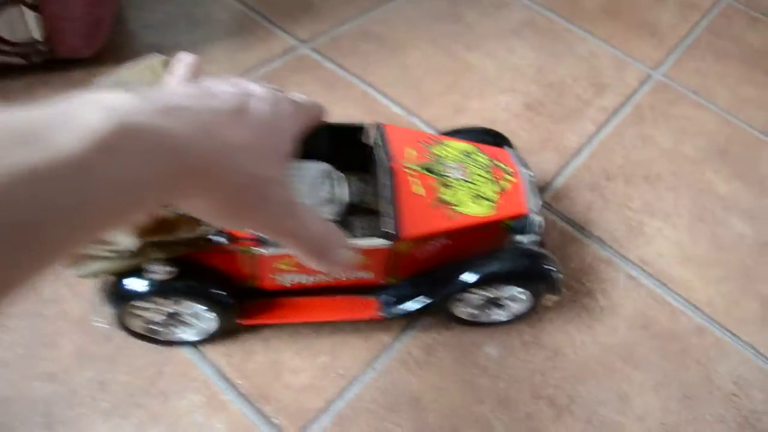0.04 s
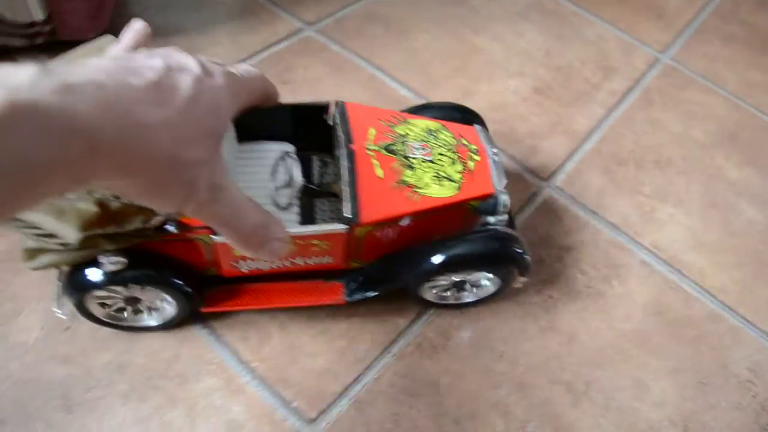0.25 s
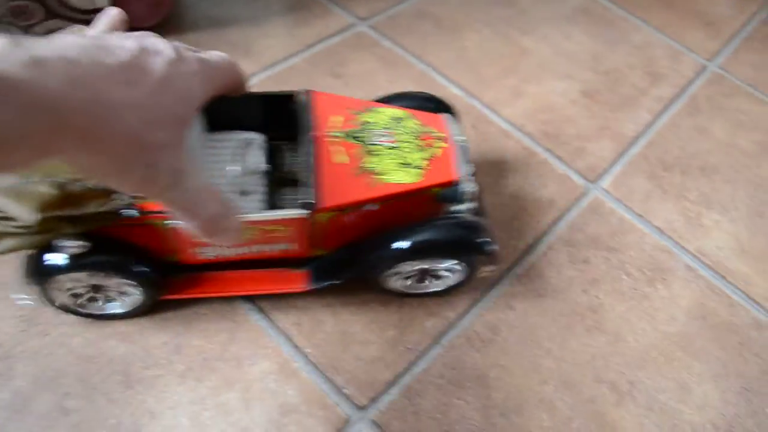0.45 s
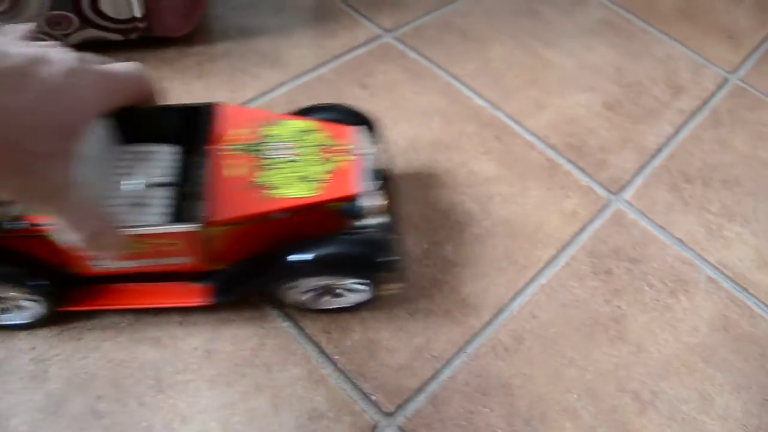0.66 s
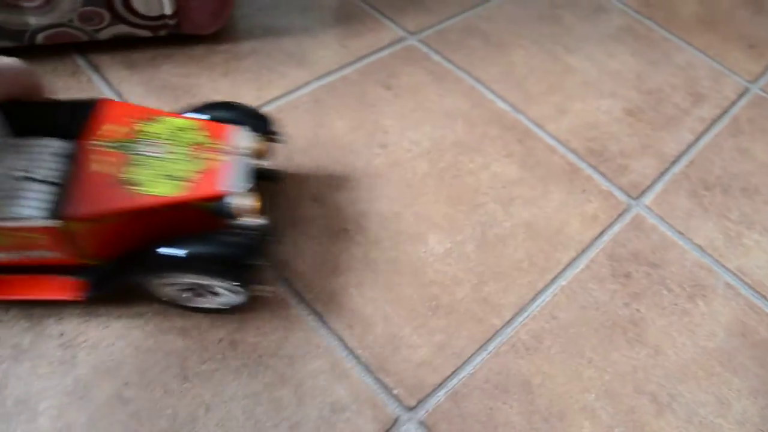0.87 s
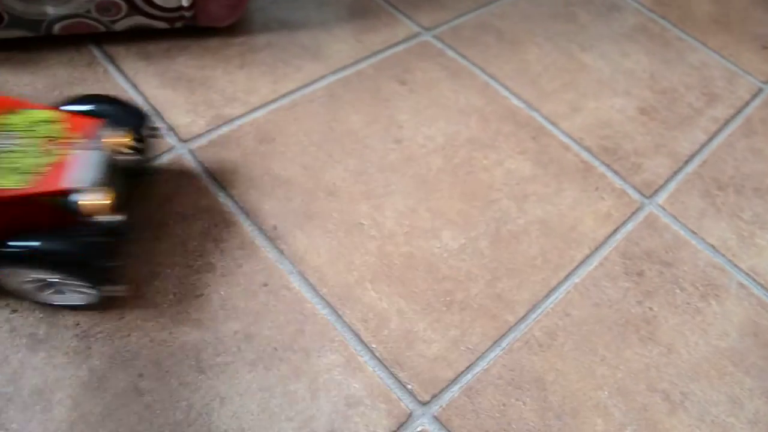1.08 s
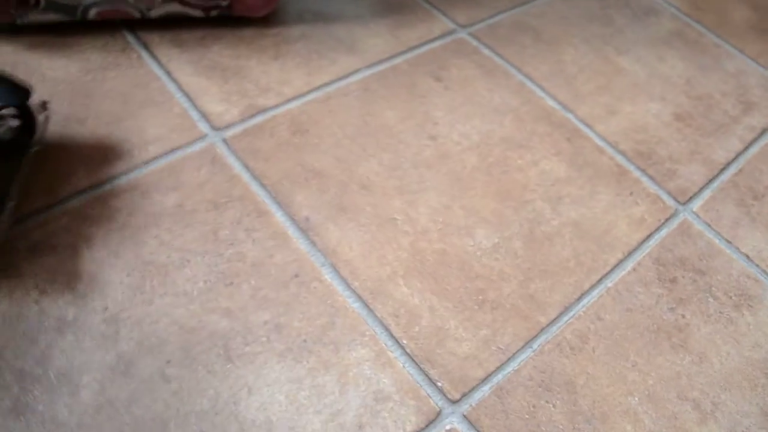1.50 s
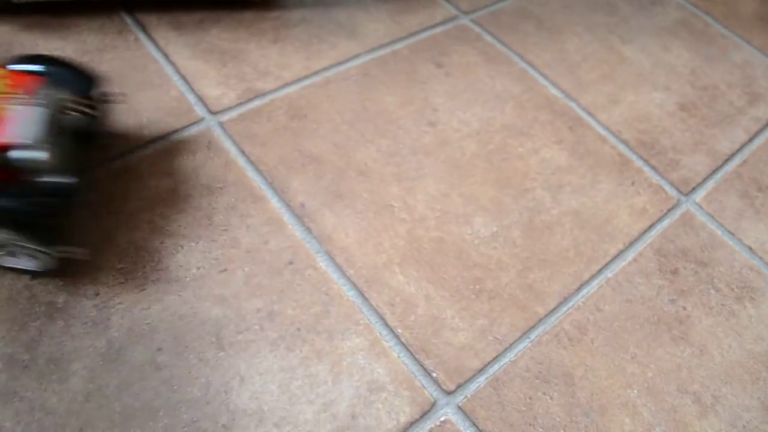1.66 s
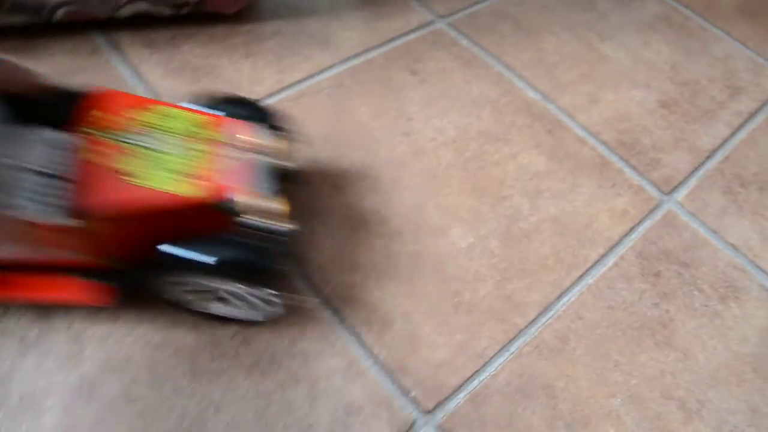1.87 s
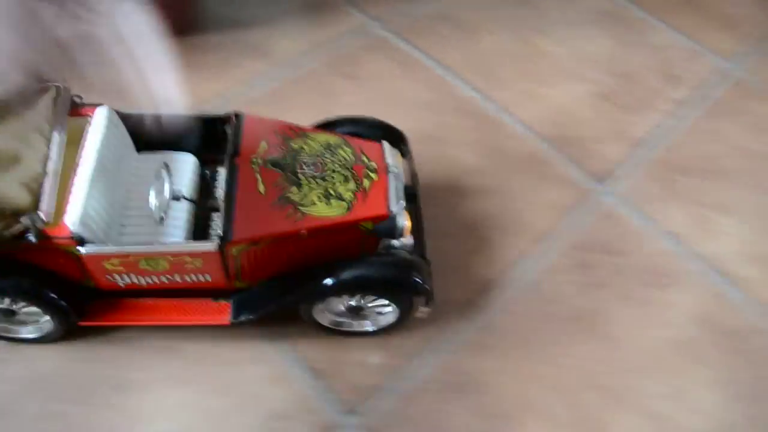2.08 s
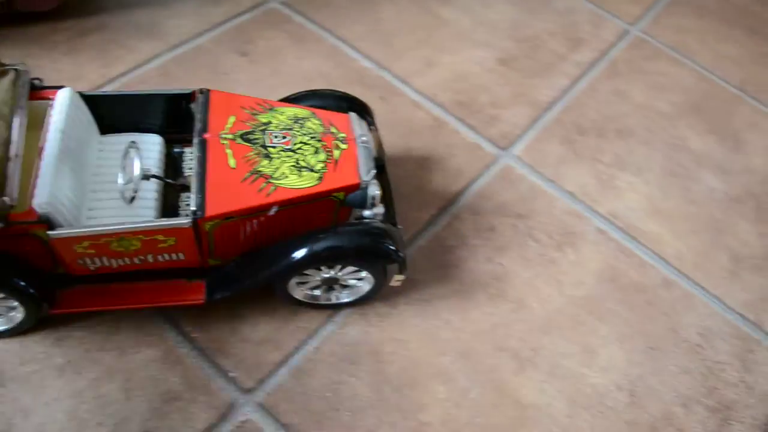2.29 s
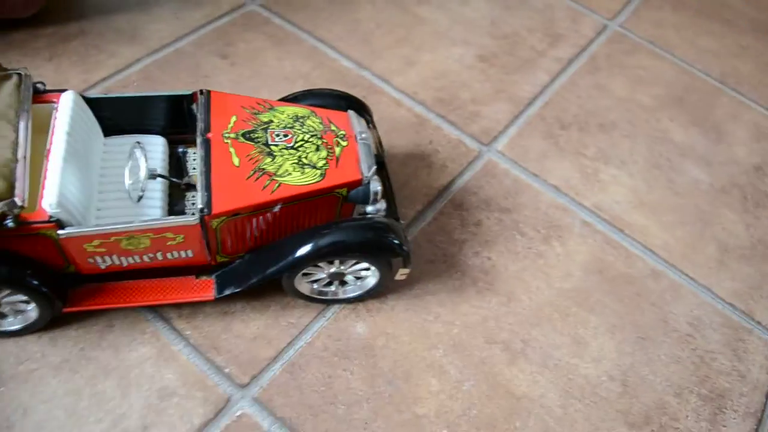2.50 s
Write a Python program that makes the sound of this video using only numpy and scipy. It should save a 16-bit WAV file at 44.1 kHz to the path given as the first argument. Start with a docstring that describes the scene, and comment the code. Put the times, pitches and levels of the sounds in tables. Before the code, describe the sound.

A tin toy car's gears grind and whine as it rolls back, then forward on tiles.

```python
"""The flywheel motor of a tin toy car, pushed back and then forward over a tiled floor indoors.
Loose gears chatter into the tin body; the pinion whines and the unbalanced flywheel hums as it
gains speed. Loose parts clack, narrow resonances swell and fade, and the wheels rumble on the
tiles. A small hard room answers the rattle, over a faint bed of air."""
import sys
import numpy as np
from scipy import signal
from scipy.fft import rfft, irfft, next_fast_len
from scipy.io import wavfile
from scipy.ndimage import uniform_filter1d, map_coordinates

SR = 44100
rng = np.random.default_rng(int(sys.argv[2]) if len(sys.argv) > 2 else 0)


def generate_wav(signal):
    """Clip the signal to [-1, 1] and save it as 16-bit WAV at the path in sys.argv[1]."""
    frames = np.transpose(np.atleast_2d(signal))
    scaled = np.clip(frames, -1, 1) * 32767
    pcm = np.round(scaled).astype(np.int16)
    wavfile.write(sys.argv[1], SR, pcm)


N = 116865


def amp(db):
    """Decibels to gain."""
    return 10 ** (np.asarray(db) / 20)


def unit(x):
    """Scale to rms 1."""
    return x / np.sqrt(np.mean(x ** 2) + 1e-20)


def curves(rows):
    """Automation lanes: one value per sample for each column after the time."""
    times, *columns = np.transpose(rows)
    return [np.interp(np.arange(N) / SR, times, column) for column in columns]


def wobble(rate):
    """A smooth random curve, rate knots a second."""
    return map_coordinates(rng.standard_normal(4096), [np.arange(N) * rate / SR], mode="wrap")


def equalise(x, points):
    """Minimum-phase EQ through (Hz, dB) points."""
    size = 2 * next_fast_len(N)
    hz, db = np.transpose(points)
    gain = amp(np.interp(np.log(np.fft.rfftfreq(size, 1 / SR) + 1), np.log(hz), db))
    cepstrum = irfft(np.log(gain))
    cepstrum[1:size // 2] *= 2  # folding the cepstrum makes the filter causal
    cepstrum[size // 2 + 1:] = 0
    return irfft(rfft(x, size) * np.exp(rfft(cepstrum)), size)[:N]


def fade(t, t60):
    """Decay by 60 dB in t60 seconds."""
    return np.exp(-np.log(1000) * t / t60)


def noise_tail(t60):
    """Decaying noise of energy 1."""
    x = rng.standard_normal(SR // 2) * fade(np.arange(SR // 2) / SR, t60)
    return x / np.linalg.norm(x)


def shifting_ring(x, t60):
    """Ring x through a thicket of modes that changes as the car and its contacts move."""
    hop = int(.035 * SR)  # time for the contacts to shift
    window = np.sin(np.pi * np.arange(2 * hop) / (2 * hop))
    padded, out = np.pad(x, (hop, 2 * hop)), np.zeros(N + 2 * SR)
    for i in range(0, N + hop, hop):
        grain = signal.fftconvolve(padded[i:i + 2 * hop] * window, noise_tail(t60))
        out[i:i + len(grain)] += grain
    return out[hop:hop + N]


def air():
    """A faint, steady bed of room tone."""
    # Colour of the air. Each row: frequency in Hz, gain in dB.
    air_eq = [(25, -17), (60, -15), (90, -22), (160, 9), (260, -9.5), (500, 8), (900, 14), (1500, 12.5),
              (3000, -11.5), (9000, -20.5), (11500, -54)]
    return amp(-57) * unit(equalise(rng.standard_normal(N), air_eq))


def room(x):
    """A small hard room adds its short reverb to the direct sound."""
    wet = amp(-8.5)
    return (x + wet * shifting_ring(x, t60=.47)) / np.hypot(1, wet)


def wheels():
    """Low rumble of the wheels on the tiles."""
    # Fader ride of the rumble. Each row: time in seconds, level in dB.
    ride = [(0.0, -55.5), (0.73, -40.5), (0.95, -42), (1.34, -41), (1.5, -49.5), (1.6, -43.5),
            (1.66, -40.5), (1.71, -47.5), (1.89, -38.5), (2.02, -48), (2.05, -34.5), (2.62, -64.5),
            (2.65, -80.5)]
    # Colour of the rolling. Each row: frequency in Hz, gain in dB.
    roll_eq = [(25, -26), (60, -28), (90, -13), (135, -11), (160, 1.5), (190, -3.5), (240, -2), (285, -9.5),
               (330, 3.5), (500, 3.5), (650, 3.5), (1200, -27)]
    return amp(curves(ride)[0] - .5) * unit(equalise(rng.standard_normal(N), roll_eq))


def resonances():
    """Narrow resonances swell and fade: rubbing metal, and a low hum as the flywheel coasts."""
    # Each row: middle and half length in seconds, pitch and filter width in Hz, level in dB.
    swells = [(0.303, 0.18, 9100, 1080, -40.5), (.918, 0.34, 5170, 260, -26), (1.196, 0.13, 1895, 90, -29),
              (1.31, .08, 1440, 50, -29.5), (1.337, 0.28, 245, 50.3, -50.5),
              (1.88, 0.16, 8900, 1310, -27.5), (2.04, 0.24, 1925, 100, -31.5),
              (2.027, .1, 2775, 110, -25.5), (2.123, 0.082, 2840, 400, -23), (2.16, .09, 4538, 60, -35),
              (2.256, 0.18, 825, 149, -33), (2.368, .12, 158, 24.8, -52)]
    t, out = np.arange(N) / SR, np.zeros(N)
    for middle, half, hz, width, db in swells:
        peak = signal.iirpeak(hz, hz / width, SR)
        band = signal.lfilter(*peak, signal.lfilter(*peak, rng.standard_normal(N)))
        swell = np.clip(1 - ((t - middle) / half) ** 2, 0, 1) ** 2
        out += amp(db) * swell * unit(band)
    return out


def tin_body(force):
    """The shell ticks and rings with its main modes and a thicket of panel modes."""
    # Main modes of the shell. Each row: frequency in Hz, relative level in dB, t60 in seconds.
    tin_modes = [(637, -0.5, 0.2), (811, -11, 0.036), (954, 0.5, 0.07), (1240, -7, 0.04), (1424, -3.5, 0.1),
                 (1538, -4, 0.022), (1872, 1, .06), (2425, -2.5, 0.019), (2756, -4, 0.1), (2902, -7, 0.13),
                 (3074, -5, 0.18), (3590, -15, 0.048), (4538, -4, .2), (4931, -2, 0.05), (5233, -6, .05)]
    modes_db, tick_db = -10.5, 4  # against the panels
    t = np.arange(SR // 2) / SR
    ring = sum(amp(db) / np.sqrt(t60) * fade(t, t60) * np.cos(2 * np.pi * hz * t)
               for hz, db, t60 in tin_modes)
    modes = signal.fftconvolve(force, ring / np.linalg.norm(ring))[:N]
    panels = shifting_ring(force, t60=.086)
    shell = amp(modes_db) * modes + panels + amp(tick_db) * force
    return shell / np.linalg.norm(amp([0, modes_db, tick_db]))


def clacks():
    """A loose part lands in a short buzz of contacts, brighter when hard; body and part both ring."""
    # Each row: start in seconds, relative strength in dB, t60 of the buzz in seconds,
    # hardness as treble gain in dB, pitch of the part in Hz.
    hits = [(0.0244, -32, 0.022, 2.5, 2430), (.041, -23.5, 0.043, 0.5, 2430),
            (0.061, -25.5, 0.037, -4, 1970), (0.126, -29, 0.029, -3, 2360), (.1296, -25, .04, 0.5, 1890),
            (.163, -22, 0.074, 1.5, 1233), (0.202, -28, .03, 6, 3650), (0.266, -13.5, .022, 7, 3560),
            (0.418, -14, .05, 2, 1860), (0.472, -15, .04, 6, 2730), (1.281, -2, 0.11, -3, 2990),
            (1.444, -23, 0.032, 6, 1420), (1.565, -15, .06, -5, 3070), (1.628, -10, 0.039, -11, 1240),
            (1.665, -18, 0.022, 4.5, 2450), (1.759, -13, 0.079, 0.5, 3050), (1.9022, -15, 0.046, 8, 2460),
            (1.911, -7, 0.015, 5, 6930), (1.916, -10.5, 0.033, 7.5, 1320), (1.944, -12, 0.053, -2, 2190),
            (2.061, -16.5, 0.041, 4.5, 1840), (2.124, -9, 0.13, -4.5, 4538), (2.333, -19, 0.029, 6.5, 1410),
            (2.422, -24, .05, -6, 1450), (2.467, -24.5, .07, -1, 1880)]
    # Colour of the struck body. Each row: frequency in Hz, gain in dB.
    clack_eq = [(50, -53.5), (150, -19.5), (400, -15.5), (900, 5.5), (2000, -1.5), (3700, -1), (6000, -6.5),
                (8000, -13), (10000, -9), (11500, -48)]
    part_db, part_stretch = -9, 2.2  # the part's ring against the buzz: level, length
    t = np.arange(SR // 2) / SR
    force, parts = np.zeros((2, N + SR))
    for start, db, t60, hard_db, hz in hits:
        buzz = noise_tail(t60)
        soft = signal.lfilter(*signal.butter(1, 1500, fs=SR), buzz)
        ring = fade(t, part_stretch * t60) * np.cos(2 * np.pi * hz * t)
        onset = round(start * SR)
        force[onset:onset + len(t)] += amp(db) * (soft + amp(hard_db) * (buzz - soft))
        parts[onset:onset + len(t)] += amp(db + part_db) * ring / np.linalg.norm(ring)
    return amp(18) * (equalise(tin_body(force[:N]), clack_eq) + parts[:N])


def flywheel(speed, chatter_db):
    """The unbalanced wheel hums, one cycle a turn; its pinion whines, one cycle a tooth."""
    # Fader ride of the hum. Each row: time in seconds, level in dB.
    hum_ride = [(.15, -88), (.38, -76), (.5, -54.5), (.68, -44), (.77, -57), (.95, -41.5), (1.06, -41.5),
                (1.2, -46.5), (1.32, -55), (1.45, -90), (1.7, -88), (1.79, -57), (1.87, -51), (1.9, -33),
                (1.935, -31), (1.99, -47), (2.075, -33.5), (2.12, -48), (2.3, -87)]
    # Fader ride of the whine. Each row: time in seconds, level against the chatter in dB.
    whine_ride = [(.35, -30), (.5, -9.5), (.6, -8.5), (.7, -5), (.78, -8.5), (.9, -14), (1.01, -5),
                  (1.07, -8.5), (1.13, -5.5), (1.2, -4), (1.25, -18), (1.33, -33), (1.8, -25), (1.84, -5),
                  (1.87, -2), (1.92, -9), (1.97, -30), (2.3, -50)]
    teeth, jitter, flutter_db, octave_db = 9, .002, 1.3, -16
    angle = 2 * np.pi * np.cumsum(speed * (1 + jitter * wobble(70))) / SR
    mesh = amp(flutter_db * wobble(109.7)) * np.sin(teeth * angle)
    octave = amp(octave_db + flutter_db * wobble(110)) * np.sin(2 * teeth * angle)
    hum = amp(curves(hum_ride)[0]) * unit(np.sin(angle))
    whine = amp(chatter_db + curves(whine_ride)[0]) * unit(mesh + octave)
    return hum + whine


def tooth_force(speed):
    """Loose teeth strike unevenly, more often with speed, over a steady scrape."""
    rate_scatter, strike_scatter_db, scrape_db = .3, 1.8, -1
    axle_ratio, axle_db, judder_db = .052, -.17, .89
    rate = 5.5 * (speed + 40)  # strikes a second
    count = np.cumsum(rate * np.exp(rate_scatter * wobble(400))) / SR
    onsets = np.flatnonzero(np.diff(np.floor(count)))
    side, size = rng.standard_normal((8192, 2))[:len(onsets)].T
    strikes = np.zeros(N)
    strikes[onsets] = np.sign(side) * amp(strike_scatter_db * np.minimum(size, 2)) / np.sqrt(rate[onsets])
    force = unit(strikes) + amp(scrape_db) * rng.standard_normal(N)
    axle_sway = np.sin(2 * np.pi * axle_ratio * np.cumsum(speed) / SR)
    return force * amp(axle_db * axle_sway + judder_db * wobble(120))


def gears(speed, chatter_db, bright_db):
    """The teeth chatter into the tin in three registers; harder pushing brings out the upper two."""
    # Colours of the three registers. Each row: frequency in Hz, gain in dB.
    body_eq = [(60, -67), (200, -32), (550, -23), (680, -8), (800, -0.5), (950, -1.5), (1050, -0.5),
               (1400, 2), (1650, -3.5), (2000, -0.5), (2700, -4), (3250, -14), (4500, -36.5), (9000, -48)]
    treble_eq = [(200, -92), (1500, -37), (3000, -1), (4200, 4), (5200, 4), (6000, 3.5), (7100, 2.5),
                 (7900, -7.5), (9500, -21), (10800, -28), (11700, -64)]
    sizzle_eq = [(1500, -70), (5000, -38), (7900, -12.5), (8450, 6), (8800, 2), (9400, 5), (10200, -0.5),
                 (10900, -11.5), (11400, -25.5), (11900, -59)]
    chatter = tin_body(tooth_force(speed))
    body = amp(-1) * unit(equalise(chatter, body_eq))
    treble = amp(bright_db - .5) * unit(equalise(chatter, treble_eq))
    sizzle = amp(.73 * bright_db - 7.5) * unit(equalise(chatter, sizzle_eq))
    return amp(chatter_db) * (body + treble + sizzle)


def scene():
    """The hand shifts faintly on the body, then pushes twice; car and room are heard in mono."""
    # Spin of the flywheel. Each row: time in seconds, speed in turns a second.
    spin = [(0, 10), (.16, 21), (.3, 75), (.5, 120), (.6, 134), (.66, 137), (.72, 138), (.75, 143),
            (.9, 151), (1, 157), (1.12, 162), (1.17, 158.3), (1.23, 157.5), (1.3, 138), (1.4, 105),
            (1.52, 12), (1.7, 60), (1.8, 108), (1.87, 145), (1.93, 155), (2, 151), (2.07, 160), (2.15, 120),
            (2.3, 68), (2.65, 5)]
    # Fader ride of the gear chatter. Each row: time in seconds, level in dB, brightness in dB.
    pushes = [(0.15, -45.5, -14), (0.2, -29.5, -10), (0.25, -26.5, -7.5), (0.3, -25, -8), (.4, -25.5, -5),
              (.48, -23, -1.5), (0.62, -21, -2), (0.7, -19, -2.5), (0.85, -21.5, 1), (1.1, -21, 0),
              (1.3, -18.5, -3.5), (1.4, -24, -8), (1.42, -32, -1), (1.45, -24, -11.5), (1.52, -38.5, -20),
              (1.55, -32.5, -11), (1.57, -26, -10), (1.61, -29, -7), (1.65, -24, -7.5), (1.71, -26.5, -6.5),
              (1.76, -23, -5.5), (1.79, -24, -2), (1.87, -22.5, -.5), (1.97, -20.5, -0.5),
              (2.06, -23, -3.5), (2.11, -21, 1), (2.14, -16.5, -5), (2.19, -26, -2.5), (2.26, -25, -9.5),
              (2.34, -28, -7), (2.38, -33.5, -8), (2.45, -33.5, -22), (2.65, -79.5, -40)]
    hand = (.12, -45, -12.5)  # the faint opening, in the same columns
    speed, = curves(spin)
    chatter_db, bright_db = uniform_filter1d(curves([hand, *pushes]), size=600, axis=1)
    tones = flywheel(speed, chatter_db)
    rattle = gears(speed, chatter_db, bright_db) + wheels() + clacks() + resonances()
    mono = room(rattle) + tones + air()
    return np.array([mono, mono])


def record(dry):
    """A brick-wall low-pass takes off the very top."""
    top_hz = 11650
    size = next_fast_len(N + SR // 2)
    passband = np.fft.rfftfreq(size, 1 / SR) < top_hz
    return irfft(rfft(dry, size) * passband, size)[:, :N]


dry = scene()
out = record(dry)
generate_wav(out)
```